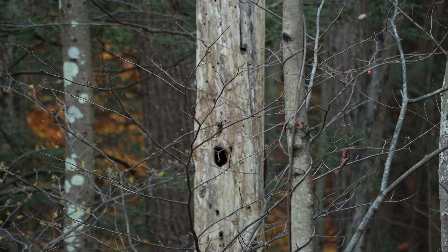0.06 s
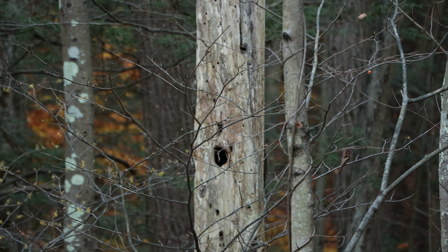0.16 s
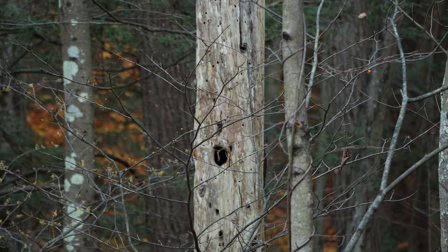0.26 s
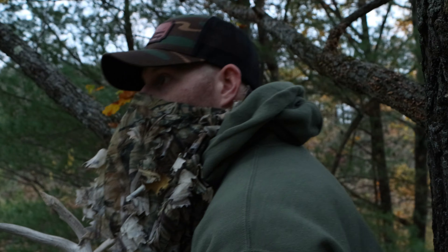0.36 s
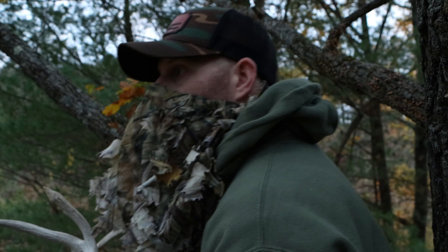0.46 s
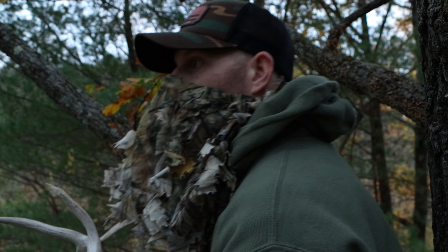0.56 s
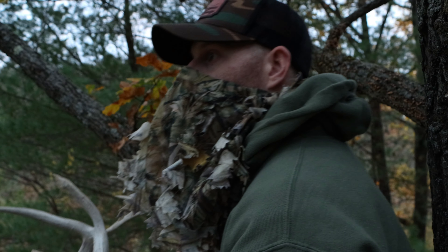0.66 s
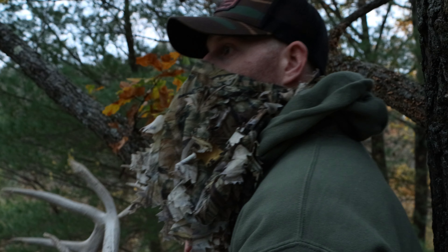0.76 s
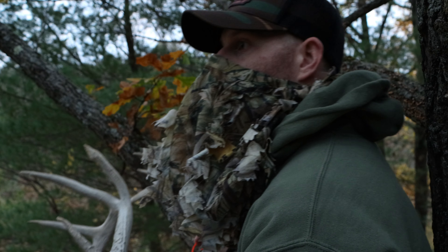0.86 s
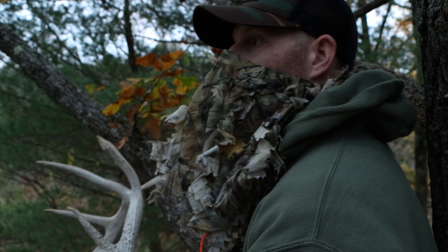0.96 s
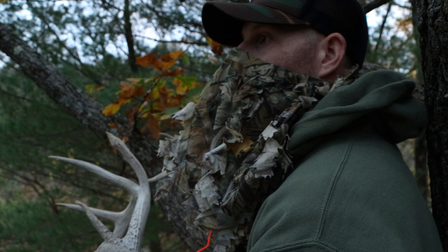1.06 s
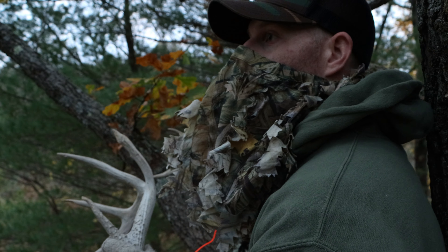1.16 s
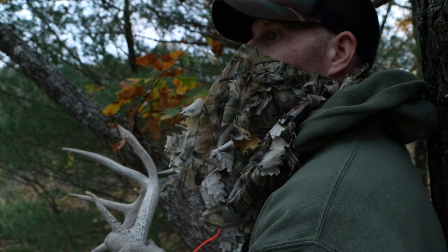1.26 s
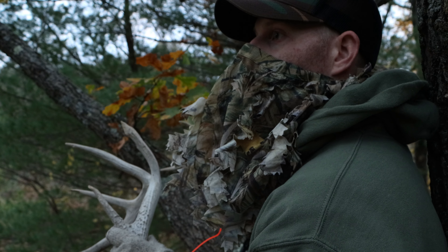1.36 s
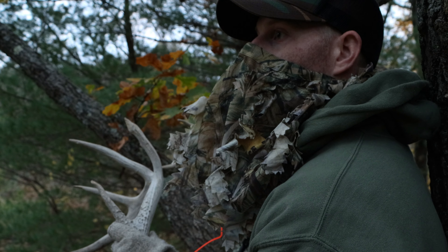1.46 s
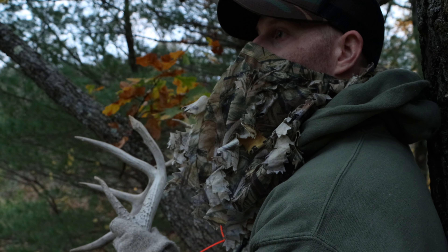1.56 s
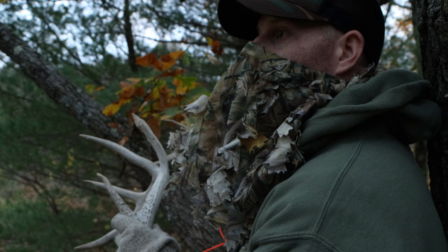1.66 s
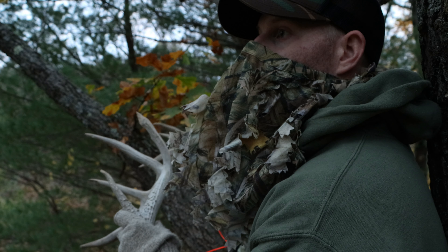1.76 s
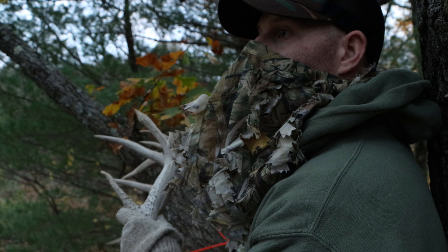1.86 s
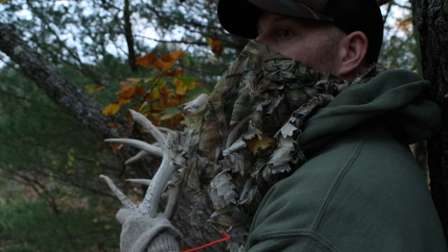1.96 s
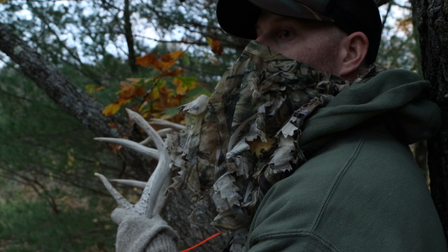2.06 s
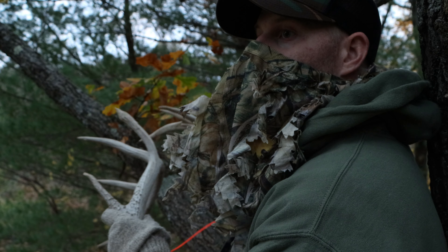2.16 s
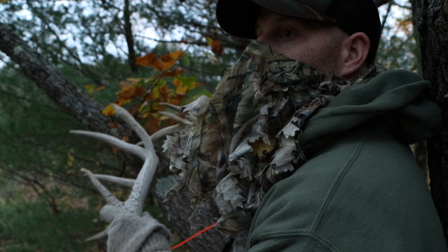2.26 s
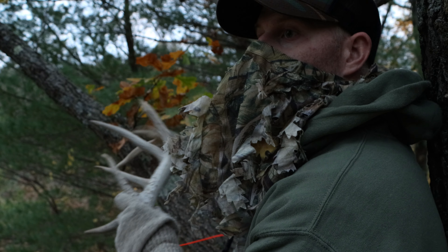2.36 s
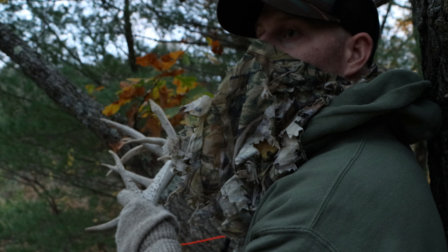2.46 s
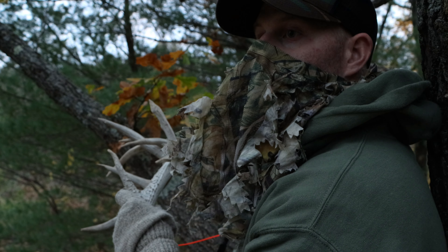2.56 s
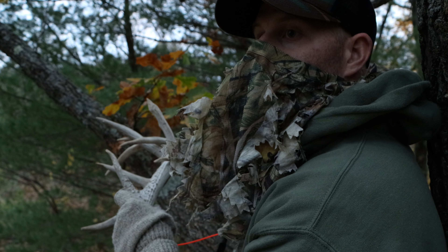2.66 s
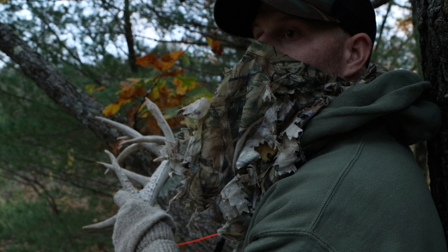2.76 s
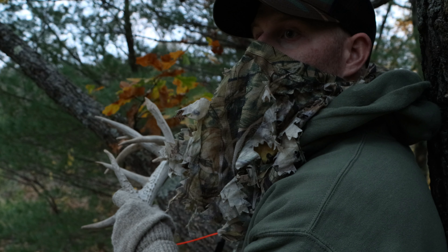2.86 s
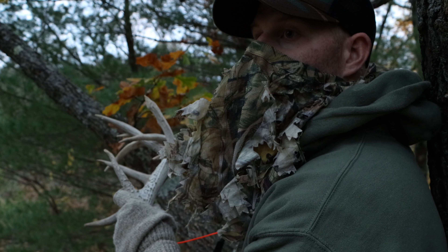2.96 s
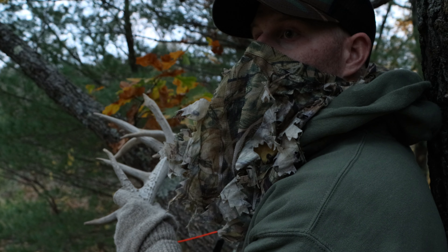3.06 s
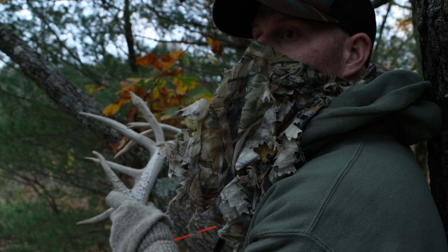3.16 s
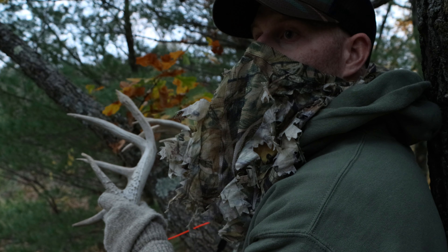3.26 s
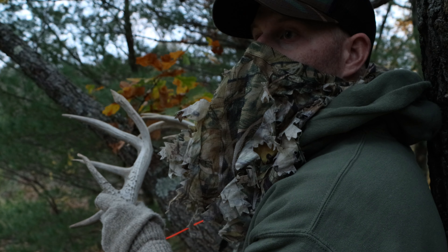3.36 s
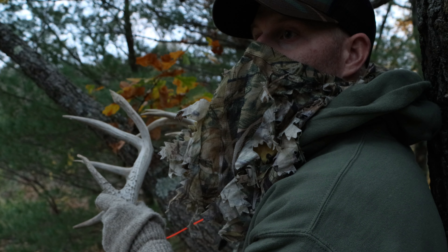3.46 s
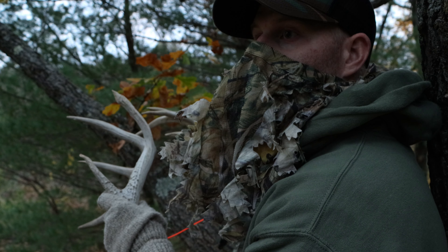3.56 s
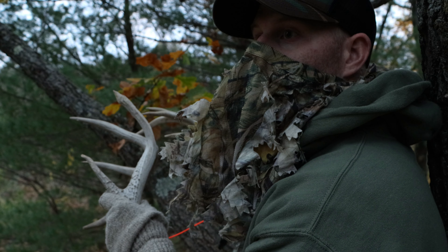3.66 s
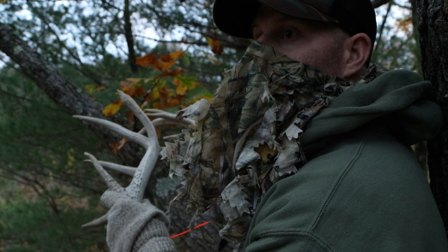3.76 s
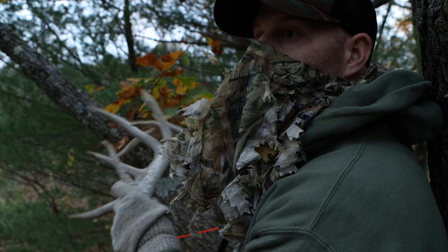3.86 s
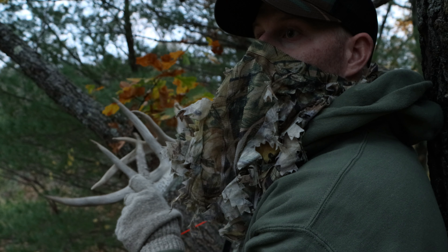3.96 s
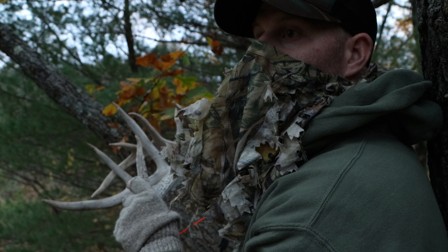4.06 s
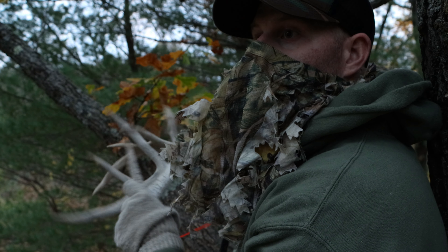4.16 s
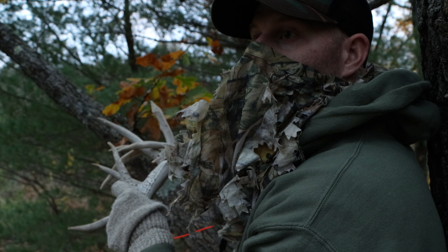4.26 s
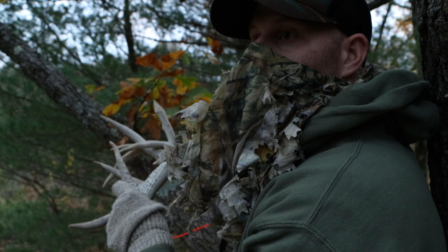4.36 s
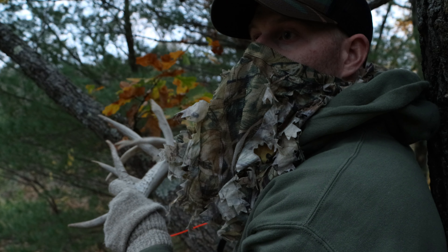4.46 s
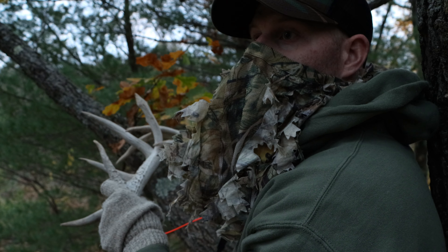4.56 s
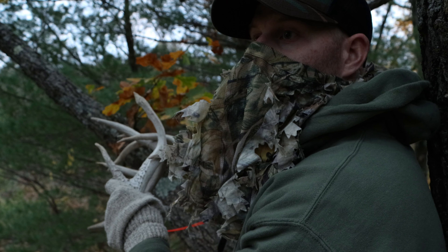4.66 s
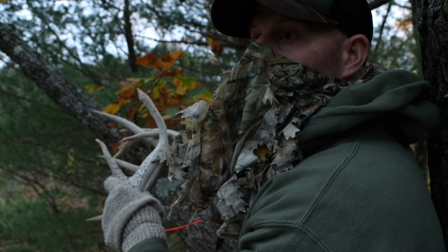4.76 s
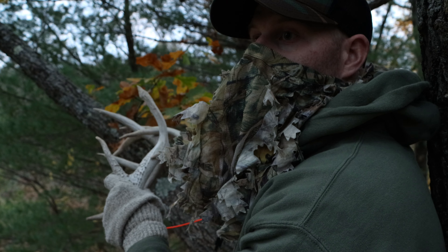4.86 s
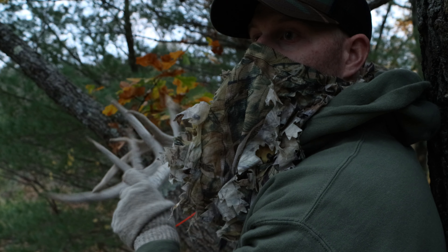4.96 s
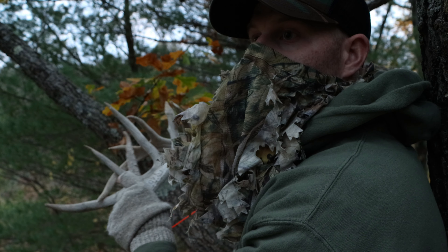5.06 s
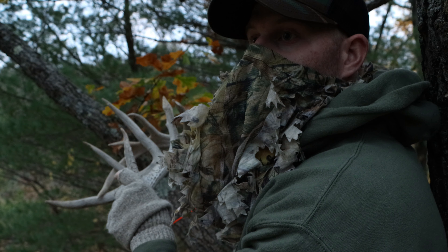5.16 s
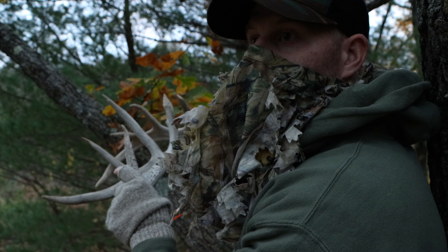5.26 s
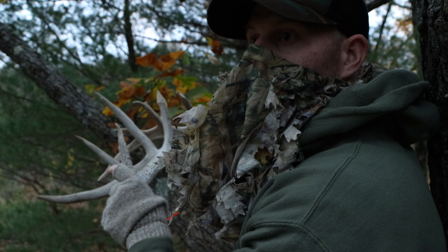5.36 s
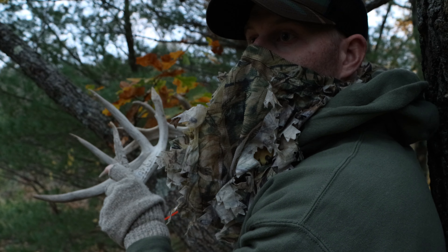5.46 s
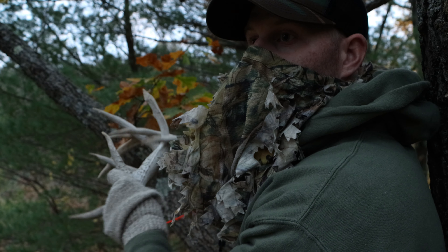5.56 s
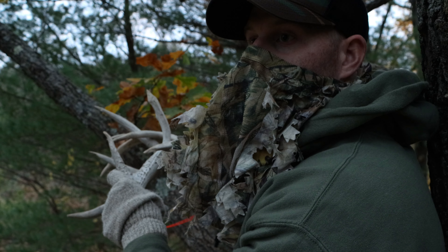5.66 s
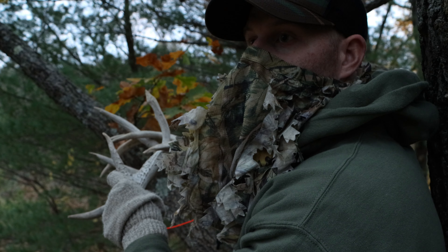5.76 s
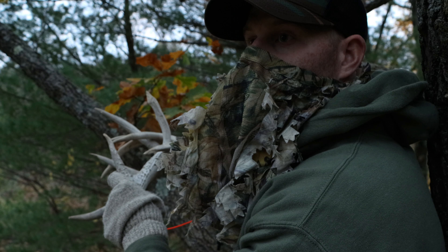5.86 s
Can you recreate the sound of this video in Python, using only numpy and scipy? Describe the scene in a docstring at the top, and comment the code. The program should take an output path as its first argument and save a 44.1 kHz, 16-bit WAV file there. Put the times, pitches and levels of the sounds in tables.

```python
"""A louder outdoor background with a far hum and faint leaf ticks cuts abruptly to quieter forest air;
the hum lingers faintly and a small bird whistles far off. Near two seconds a hunter knocks two deer
antlers together close by, trailed by a soft, fading hiss, then clashes them harder: dry knocks and
rebounds ring the tines and beams, and trunks scatter the clacks back. The bird calls again, and from four
seconds on comes a longer bout with tines scraping between blows, a last faint whistle and a final clash."""
import sys
import numpy as np
from scipy import signal
from scipy.fft import rfft, irfft
from scipy.io import wavfile

SR = 44100
rng = np.random.default_rng(int(sys.argv[2]) if len(sys.argv) > 2 else 0)


def persist_wave(psi):
    """Save psi, clipped to +-1, as 16-bit WAV."""
    counts = np.round(np.clip(psi, -1, 1) * 32767).astype(np.int16)
    wavfile.write(sys.argv[1], SR, np.atleast_2d(counts).T)


N = 260631
T = np.arange(N) / SR
OPENING_END_S = .366

# The tone of the louder opening background. Each row: frequency in Hz, relative level in dB.
OPENING_SPECTRUM = [(12, -19), (20, -3.5), (98, -4.5), (210, -9.5), (328, -14), (357, -20), (388, -10.5),
                    (527, -8.5), (802, -1.5), (1120, -13), (1260, -12), (4300, -27), (8890, -34),
                    (16000, -41)]
# The tone of the still forest air. Each row: frequency in Hz, relative level in dB.
AIR_SPECTRUM = [(15, -39), (25, -16), (48, -1), (153, -3), (185, -1.5), (256, -5.5), (354, -3), (384, -5.5),
                (427, -7), (887, -3.5), (2840, -19), (10400, -25), (14800, -27), (16000, -30.5)]
# Thin, rising bird calls. Each row: start in seconds, relative level in dB, starting pitch in Hz.
BIRD_CALLS = [(.742, -77, 5740), (3.702, -71.5, 5350), (5.235, -82, 6800)]
# Bending modes of the hand-held antlers. Each row: pitch in Hz, relative level in dB, t60 in seconds.
ANTLER_MODES = [ (252, -20.5, .08), (335, -20.5, 0.027), (467, -17, 0.1), (581, -13, 0.059),
                (805, -11, 0.046), (866, -8, 0.056), (1071, -10, 0.041), (1268, -9, 0.057),
                (1435, -7, 0.034), (1580, -11, 0.018), (1770, -8, 0.042), (2100, -8, .028),
                (2400, -7.5, 0.0098), (2682, -0.5, 0.025), (3085, -0.5, 0.017), (3374, 2, 0.0093),
                (3640, -3, 0.019), (4070, 1, 0.014), (4570, -5, .02), (4950, -4.5, 0.013), (5530, -4, .018),
                (7720, -1, 0.014), (8200, -5.5, 0.015), (9840, -8, 0.013), (9380, -9.5, .016),
                (12200, -7, .014)]
# The crack of the many weak overtones. Each row: frequency in Hz, gain in dB.
CRACK_SPECTRUM = [(120, -15), (210, -8), (500, -8), (1200, -1), (3000, 1.5), (4300, 2), (5600, 1),
                  (6600, -6), (7800, 0), (9000, -3.5), (12500, -0.5), (16000, -7)]
# The tines, from the longest (a) to the shortest (l). Each entry: letter, note in Hz.
TINE_HZ = dict(a=856, b=1100, c=1430, d=1770, e=2200, f=2400, g=2690, h=2930, i=3230, j=4165, k=4950, l=7750)
# Single blows of antler on antler. Each row: start in seconds, attack level in dB, contact brightness
# in Hz, the two tines that meet, low-end gain from the heavy beam in dB.
BLOWS = [ (1.9160, -32, 8990, "lh", 10.5), (1.9506, -39.5, 8000, "lg", 10), (2.4936, -27, 3000, "id", -13),
         (2.4995, -18, 14520, "kk", -5.5), (2.5030, -20, 5800, "cd", -4), (2.5080, -23.5, 12000, "dc", 1.5),
         (2.5403, -39.5, 2800, "jc", -2.5), (4.0255, -18, 5800, "ga", -6.5),
         (4.0303, -25.5, 4200, "ga", -0.5), (4.0459, -28, 3900, "jc", -3.5),
         (4.1022, -38.5, 3500, "fc", -5), (4.2327, -42, 1800, "ca", 4), (4.2879, -36.5, 1790, "aa", -2.5),
         (4.3085, -31.5, 7000, "jd", 7), (4.315, -34.5, 5500, "da", 14), (4.348, -48, 2600, "dc", 0),
         (4.6968, -41, 5600, "hc", 1.5), (4.7458, -23.5, 17000, "lj", -2), (4.7619, -21.5, 7500, "jg", 0),
         (4.778, -36, 4120, "je", -2.5), (4.8275, -56.5, 3000, "jb", 12), (4.9885, -57.5, 2525, "gc", 5),
         (5.0368, -17, 16000, "fe", -14), (5.0880, -21.5, 7140, "jj", -20),
         (5.1100, -33.5, 4670, "jf", -11.5), (5.6357, -26, 3700, "hb", -3), (5.6414, -13, 10500, "hd", -7),
         (5.6445, -17, 4500, "id", -2), (5.6890, -47, 2000, "da", -6)]
# What trunks and leaves throw back. Each row: frequency in Hz, echo gain in dB.
ECHO_SPECTRUM = [(200, -26), (700, -24), (1500, -27.5), (3000, -25.5), (4200, -23), (6000, -22.5),
                 (8000, -20), (13000, -26)]
# Runs of rebounds. Each row: start in seconds, first attack level in dB, contact brightness in Hz,
# the two tines, low-end gain from the beam in dB, first gap in seconds, loss per rebound in dB.
REBOUND_RUNS = [ (1.9619, -45, 7500, "fb", -1, 0.0091, 3.5), (2.5166, -31, 6500, "ic", 4.5, .0045, 3.5),
                (4.0636, -39, 3200, "fc", 5, 0.017, 4), (4.2973, -41.5, 3000, "da", 5, .0075, 2),
                (4.7180, -46, 5200, "jg", 8, 0.01, 0), (4.768, -35.5, 4460, "ic", 0.5, 0.0047, 6),
                (5.053, -25, 3980, "fj", 5, 0.015, 6)]
# A soft, fading hiss trailing the first knocks, then three scrapes of tine on tine. Each row: start in
# seconds, length in seconds, opening level in dB, closing level in dB, the two tines that colour it.
HISS_AND_SCRAPES = [ (1.965, .19, -59.5, -74.5, "lf"), (4.031, .085, -49, -58.5, "jf"),
                    (4.244, .07, -58.5, -46.5, "ja"), (4.749, 0.083, -46, -67, "jc")]


def undb(db):
    """Decibels to gain."""
    return 10 ** (np.asarray(db) / 20)


def unit(x):
    """Scale to rms 1."""
    return x / np.sqrt(np.mean(x ** 2))


def attack_unit(x):
    """Scale to rms 1 over the first 5 ms."""
    return x / np.sqrt(np.mean(x[:SR // 200] ** 2))


def fade(t, t60):
    """Exponential decay that loses 60 dB in t60 seconds."""
    return np.exp(-np.log(1000) * t / t60)


def walk(turns_per_s):
    """Smooth random wander, spread near 1."""
    steps = rng.standard_normal(512)
    return np.interp(T * turns_per_s, np.arange(len(steps)), steps)


def add(out, start_s, x):
    """Mix x into out from start_s on."""
    start = int(start_s * SR)
    out[start:start + len(x)] += x


def colour(x, points):
    """Minimum-phase EQ through (Hz, dB) points, so nothing rings ahead of an attack."""
    hz, db = np.transpose(points)
    size = 4096
    grid = np.maximum(np.fft.rfftfreq(size, 1 / SR), 1)
    gain = undb(np.interp(np.log(grid), np.log(hz), db))
    cepstrum = irfft(np.log(gain))
    cepstrum[1:size // 2] *= 2
    cepstrum[size // 2 + 1:] = 0
    return signal.fftconvolve(x, irfft(np.exp(rfft(cepstrum))))[:len(x)]


def resonate(x, hz, width_hz):
    """One resonance, gain 1 at its centre."""
    return signal.lfilter(*signal.iirpeak(hz, hz / width_hz, fs=SR), x)


def lowpass(x, hz, order):
    """Butterworth low-pass."""
    return signal.lfilter(*signal.butter(order, min(hz, .45 * SR), fs=SR), x)


def highpass(x, hz, order):
    """Butterworth high-pass."""
    return signal.sosfilt(signal.butter(order, hz, "high", fs=SR, output="sos"), x)


def opening_background(db=-60.5, flutter_db=1.0, hollow_db=-69, cutoff_s=0.0089):
    """A louder outdoor background with a hollow note in it; both cut off abruptly."""
    bed = unit(colour(rng.standard_normal(N), OPENING_SPECTRUM)) * undb(db + flutter_db * walk(31))
    hollow = undb(hollow_db) * unit(resonate(rng.standard_normal(N), hz=815, width_hz=110))
    return (bed + hollow) * np.clip((OPENING_END_S - T) / cutoff_s, 0, 1)


def far_hum(hz=361, waver=0.007, start_db=-69, drop_db=10, sink_db_per_s=6.5, waver_db=2):
    """A far, wavering tone, louder in the opening background, that then sinks into the forest air."""
    since_opening = np.maximum(T - OPENING_END_S, 0)
    db = start_db - drop_db * (1 - fade(since_opening, 0.037)) - sink_db_per_s * since_opening
    pitch = hz * (1 + waver * walk(14))
    tone = np.sin(2 * np.pi * np.cumsum(pitch) / SR)
    return unit(tone) * undb(db + waver_db * walk(26))


def leaf_rustle(ticks_per_s=320, db=-76, tick_t60=0.018):
    """Dry leaves tick faintly in the opening background."""
    ticks = (rng.random(N) < ticks_per_s / SR) * rng.exponential(size=N)
    envelope = signal.fftconvolve(ticks, fade(T[:SR], tick_t60))[:N]
    leaves = resonate(envelope * rng.standard_normal(N), hz=8000, width_hz=5000)
    return undb(db) * unit(lowpass(leaves, 12300, order=4)) * (T < OPENING_END_S)


def forest_air(db=-69, swell_db=0.94):
    """A soft, dark bed of air that gently swells and eases."""
    return unit(colour(rng.standard_normal(N), AIR_SPECTRUM)) * undb(db - swell_db * walk(2.2))


def bird(top_hz=7350, rise_s=0.006, length_s=0.02, echo_t60=0.62, direct_gain=0.3, echo_gain=4.2):
    """Short upward whistles that level off, smeared by the trees."""
    calls = np.zeros(N)
    for start_s, db, start_hz in BIRD_CALLS:
        t = np.clip(T - start_s, 0, length_s)
        hz = top_hz + (start_hz - top_hz) * np.exp(-(t / rise_s) ** 2 / 2)
        calls += undb(db) * np.sin(np.pi * t / length_s) * np.sin(2 * np.pi * np.cumsum(hz) / SR)
    trees = rng.standard_normal(SR) * fade(T[:SR], echo_t60)
    echo = signal.fftconvolve(calls, trees / np.linalg.norm(trees))[:N]
    return direct_gain * calls + echo_gain * echo


def antler_ring(t, scatter_db=2, detune=0.015):
    """The bending modes ring; place of contact and grip change their weights, signs and tuning."""
    hz, db, t60 = np.transpose(ANTLER_MODES)[:, :, None]
    weight, shift, side = rng.standard_normal((3, len(ANTLER_MODES), 1))
    swing = np.sin(2 * np.pi * hz * (1 + detune * shift) * t)
    return np.sum(np.sign(side) * undb(db + scatter_db * weight) * swing * fade(t, t60), axis=0)


def crack(t, t60_at_1k=.06, damping_slope=0.61, snap_db=6, snap_t60=.006, tick_db=21):
    """Dense overtones: a tick and snap at contact, then the high ones die before the low ones."""
    noise = rfft(rng.standard_normal(len(t)))
    octave = np.log2(np.maximum(np.fft.rfftfreq(len(t), 1 / SR), 1) / 1000)
    centres = np.arange(-3, 5)  # octaves from 1 kHz
    overtones = np.zeros(len(t))
    for centre in centres:
        band = irfft(noise * np.interp(octave, centres, centres == centre), len(t))
        overtones += band * fade(t, t60_at_1k * 2. ** (-damping_slope * centre))
    snap = 1 + undb(snap_db) * fade(t, snap_t60)
    tick = undb(tick_db) * (t == 0)
    return colour(overtones * snap + tick, CRACK_SPECTRUM)


def tine_note(t, hz, t60_at_1k=0.031, damping_slope=.33, weak_above_hz=6500):
    """The note of one tine; short, high tines ring more briefly and faintly."""
    t60 = t60_at_1k * (1000 / hz) ** damping_slope
    return np.sin(2 * np.pi * hz * t) * fade(t, t60) / (1 + (hz / weak_above_hz) ** 4)


def knock(contact_hz, pair, beam_db, ring_db=-1, crack_db=3, note_db=1):
    """One dry clack of antler on antler, scaled to rms 1 at its attack."""
    t = T[:4096]
    clack = undb(ring_db) * antler_ring(t) + undb(crack_db) * crack(t)
    # the two tines that meet favour the modes near them and sound their own notes
    notes = [TINE_HZ[name] for name in pair]
    clack = clack + sum(resonate(clack, hz, width_hz=0.22 * hz) for hz in notes)
    clack = attack_unit(clack) + undb(note_db) * sum(tine_note(t, hz) for hz in notes)
    # a blow near the base also moves the heavy beam: a low shelf sets its weight
    clack = clack + (undb(beam_db) - 1) * lowpass(clack, hz=900, order=1)
    # a glancing, longer contact cannot excite the treble
    clack = lowpass(clack, contact_hz, order=2)
    # slender bone radiates almost nothing below its lowest mode
    return attack_unit(highpass(clack, hz=200, order=4))


def clashes():
    """The antlers strike each other in clusters of single blows."""
    out = np.zeros(N + SR)
    for start_s, db, contact_hz, pair, beam_db in BLOWS:
        add(out, start_s, undb(db) * knock(contact_hz, pair, beam_db))
    return out[:N]


def woodland_echo(x, near_t60=0.34, far_t60=1.3, far_db=-15.5, far_hz=3000, far_octaves=0.38,
                  onset_s=0.0034, flicker_db=1.6, absorb_hz=14500):
    """Countless trunks and leaves scatter each band into a diffuse tail; upper mids carry furthest."""
    t = T[:SR]
    hz, db = np.transpose(ECHO_SPECTRUM)
    edges_hz = [180, 450, 900, 1500, 2300, 3400, 4700, 6400, 9000, 16000]
    onset = 1 - np.exp(-(t / onset_s) ** 2)
    out = np.zeros(N)
    for low, high in zip(edges_hz, edges_hz[1:]):
        centre = np.sqrt(low * high)
        band = signal.butter(3, (low, high), "band", fs=SR, output="sos")
        reach = undb(far_db) * np.exp(-(np.log2(centre / far_hz) / far_octaves) ** 2 / 2)
        t60 = near_t60 / (1 + (centre / absorb_hz) ** 2)  # air and foliage swallow the treble
        tail = (fade(t, t60) ** 2 + (reach * fade(t, far_t60)) ** 2) * onset
        power = np.abs(signal.fftconvolve(signal.sosfilt(band, x) ** 2, tail / tail.sum())[:N])
        scatter = unit(signal.sosfilt(band, rng.standard_normal(N)))
        out += np.sqrt(power) * scatter * undb(np.interp(centre, hz, db) + flicker_db * walk(70))
    return out


def chatter(knocks=4, gap_ratio=.84):
    """A loosely held antler rebounds, each knock sooner than the last and usually lighter."""
    out = np.zeros(N + SR)
    for at_s, db, contact_hz, pair, beam_db, gap_s, loss_db in REBOUND_RUNS:
        for k in range(knocks):
            add(out, at_s, undb(db - k * loss_db) * knock(contact_hz, pair, beam_db, note_db=-1))
            at_s += gap_s * gap_ratio ** k
    return out[:N]


def hiss_and_scrapes(grains_per_s=1500, layers=4, contact_hz=8000):
    """Dense tiny knocks blur into a soft hiss, and later into ridges of bone catching and slipping."""
    out = np.zeros(N + SR)
    for start_s, length_s, start_db, end_db, pair in HISS_AND_SCRAPES:
        size = int(length_s * SR)
        triggers = rng.random((layers, size)) < grains_per_s / layers / SR
        texture = np.zeros(size)
        for impulses in triggers * rng.standard_normal((layers, size)):
            grain = knock(contact_hz, pair, beam_db=12.5, ring_db=-2.5, note_db=-8)
            texture += signal.fftconvolve(impulses, grain)[:size]
        envelope = undb(np.linspace(start_db, end_db, size)) * signal.windows.tukey(size, .15)
        add(out, start_s, unit(texture) * envelope)
    return out[:N]


def scene():
    """Antlers up front, the woodland around them, in mono."""
    antlers = clashes() + chatter() + hiss_and_scrapes()
    mix = antlers + woodland_echo(antlers) + bird() + forest_air() + opening_background()
    return (mix + far_hum() + leaf_rustle())[None]


def record(dry, ceiling=0.7, top_hz=16400):
    """Soft saturation rounds the hardest peaks, and a steep low-pass cuts the very top."""
    rounded = ceiling * np.tanh(dry / ceiling)
    return signal.sosfilt(signal.ellip(10, .2, 80, top_hz, fs=SR, output="sos"), rounded)


dry = scene()
out = record(dry)
persist_wave(out)
```